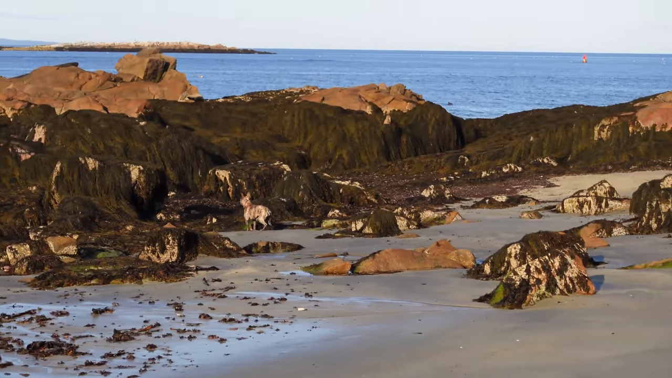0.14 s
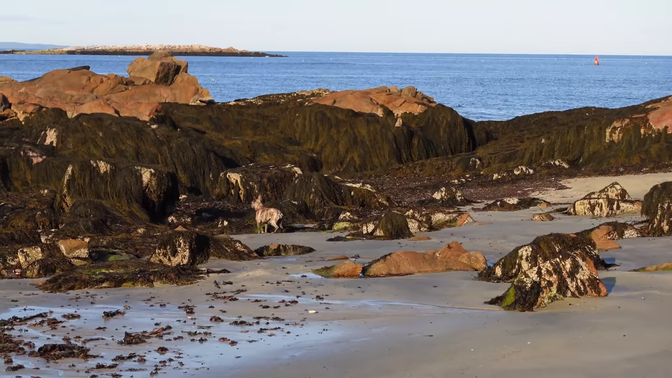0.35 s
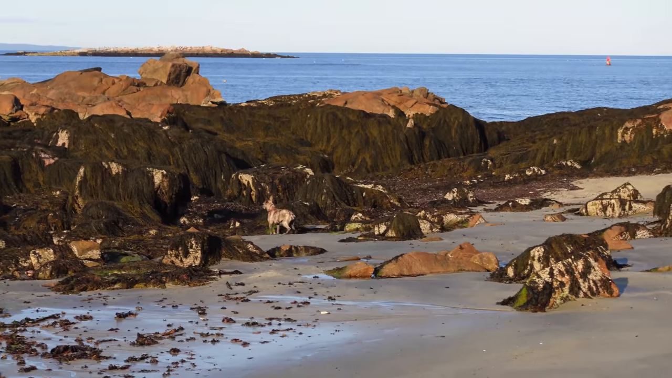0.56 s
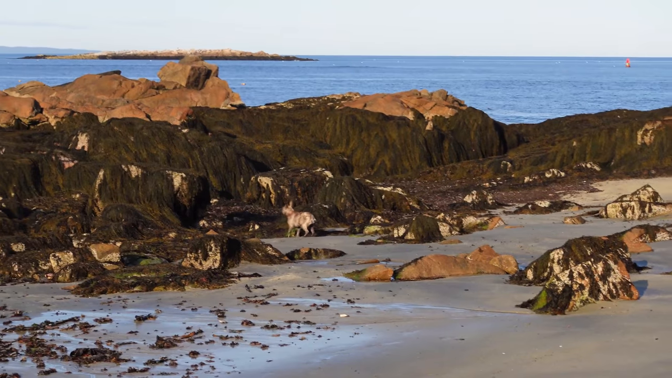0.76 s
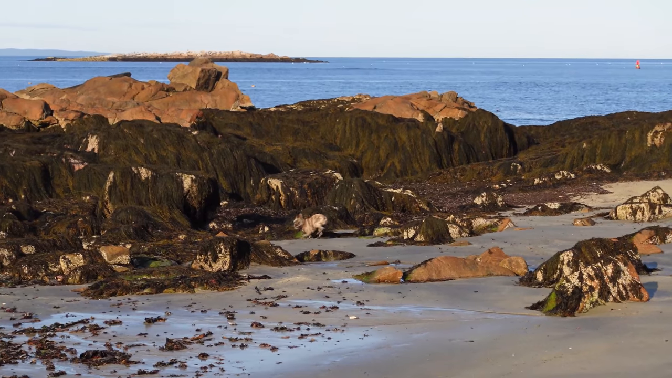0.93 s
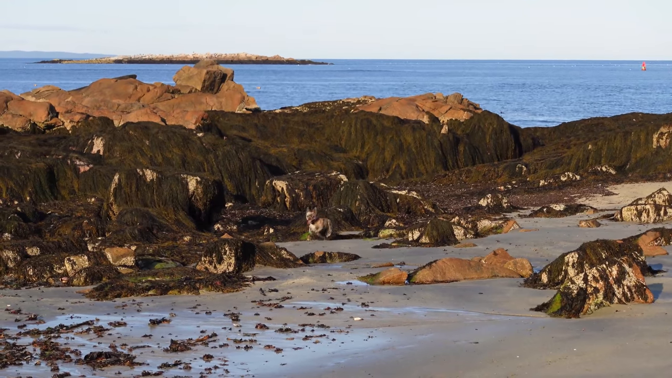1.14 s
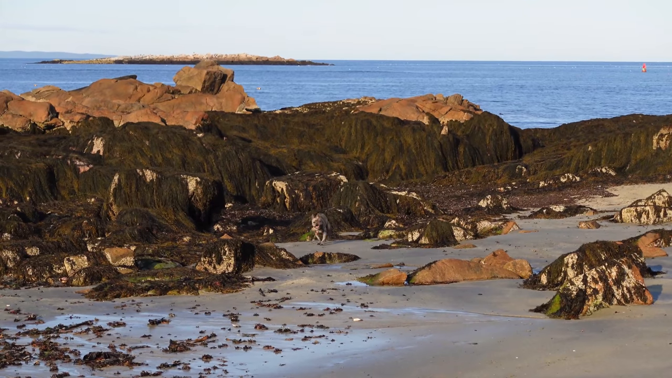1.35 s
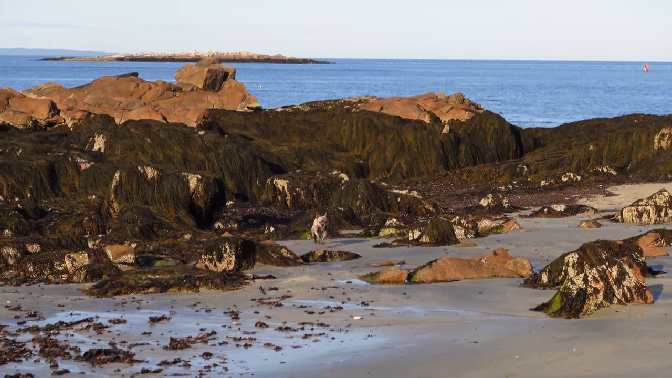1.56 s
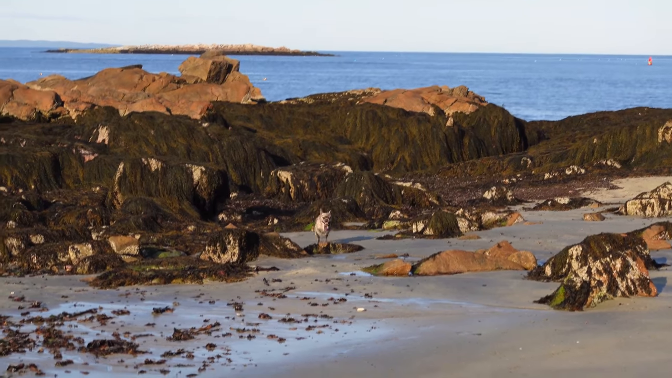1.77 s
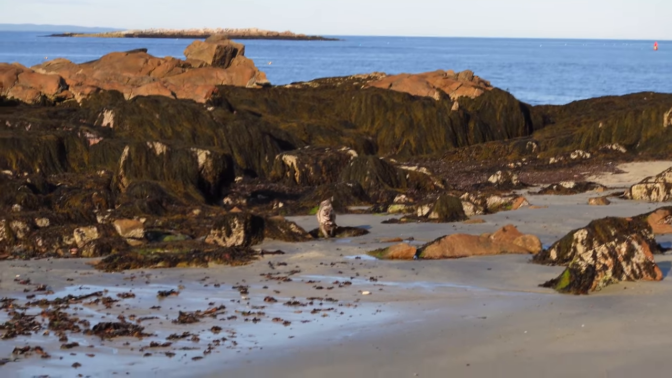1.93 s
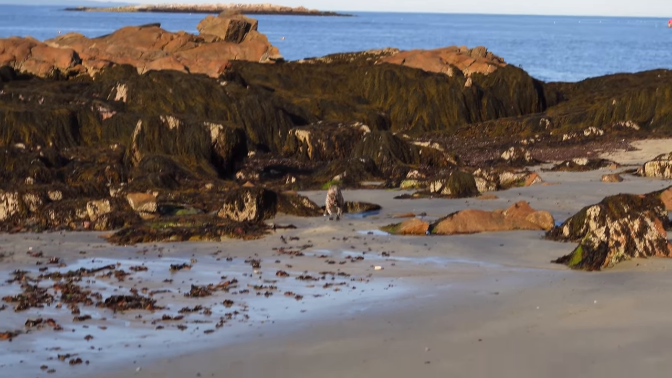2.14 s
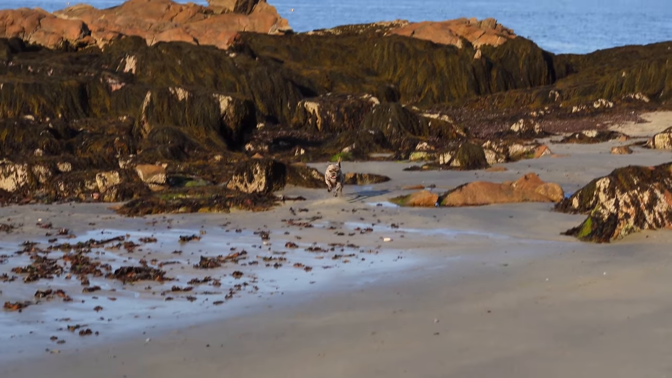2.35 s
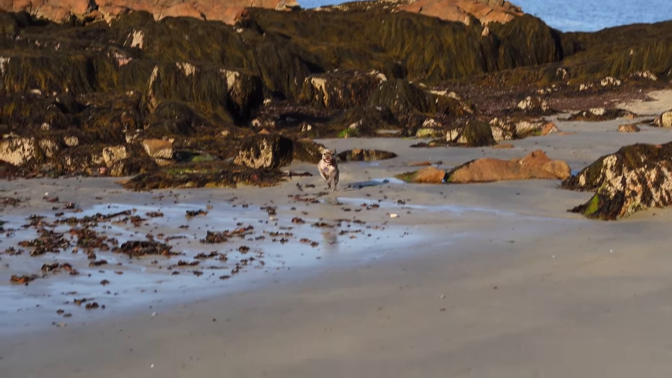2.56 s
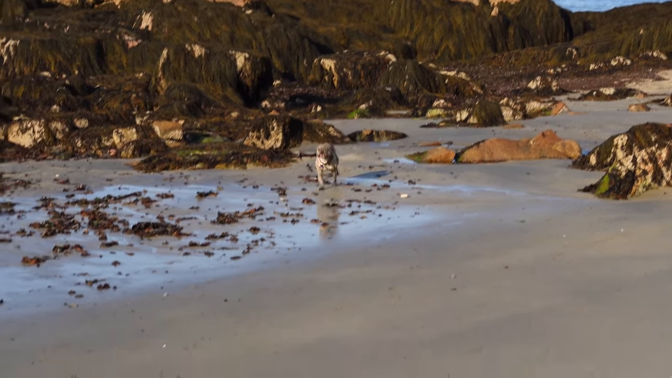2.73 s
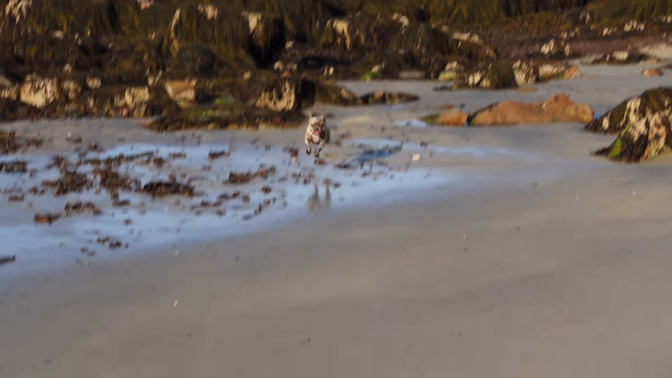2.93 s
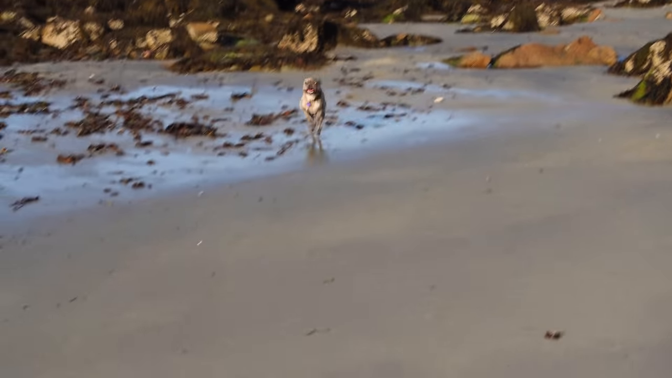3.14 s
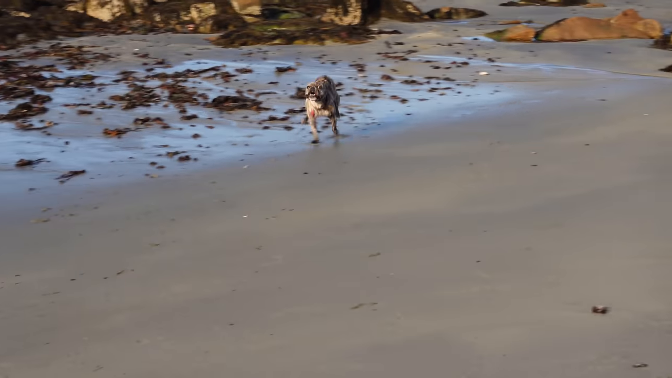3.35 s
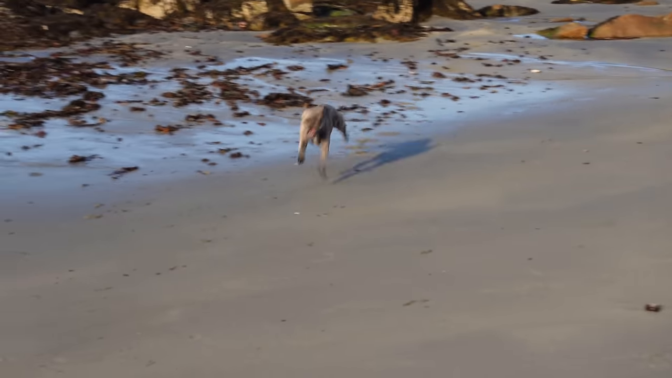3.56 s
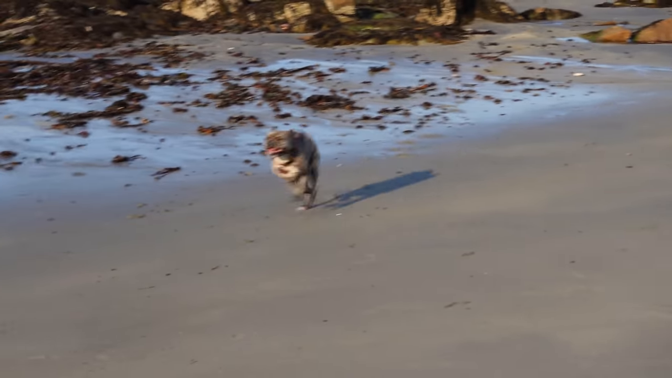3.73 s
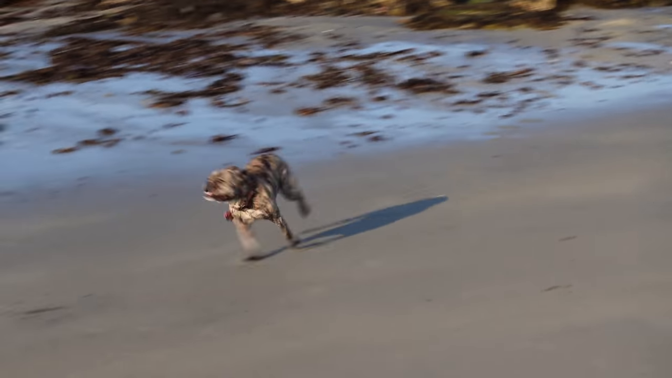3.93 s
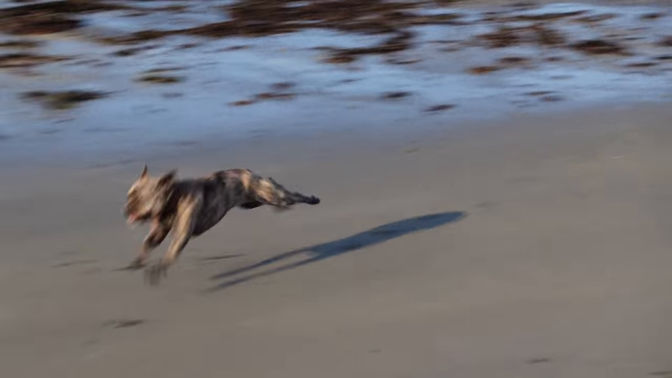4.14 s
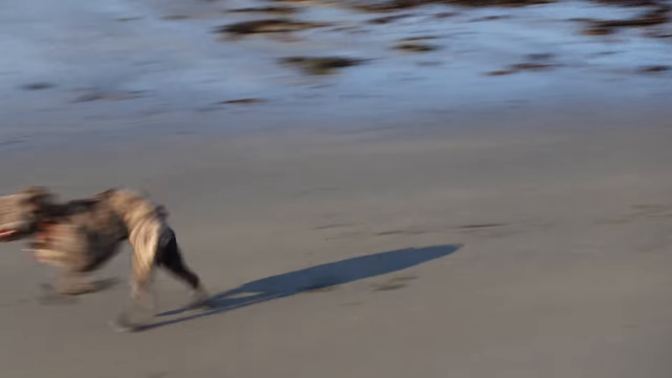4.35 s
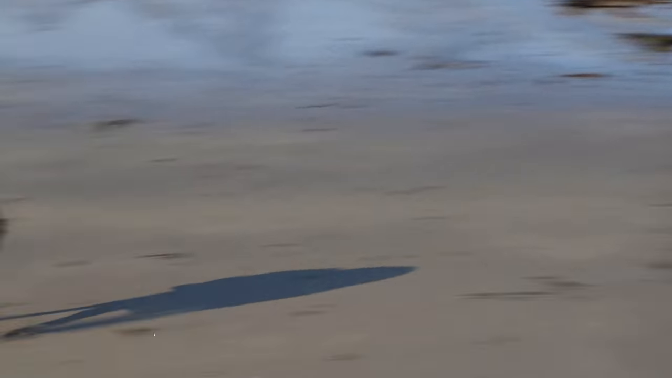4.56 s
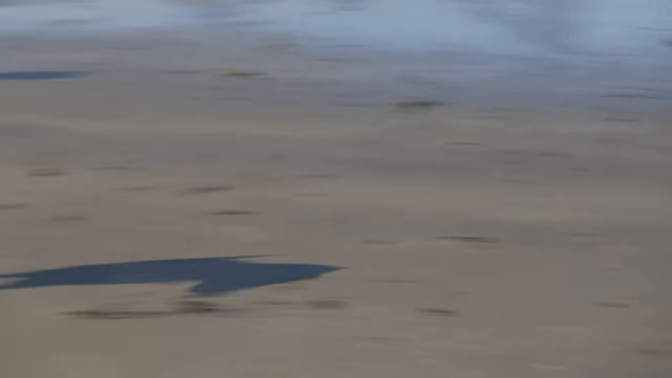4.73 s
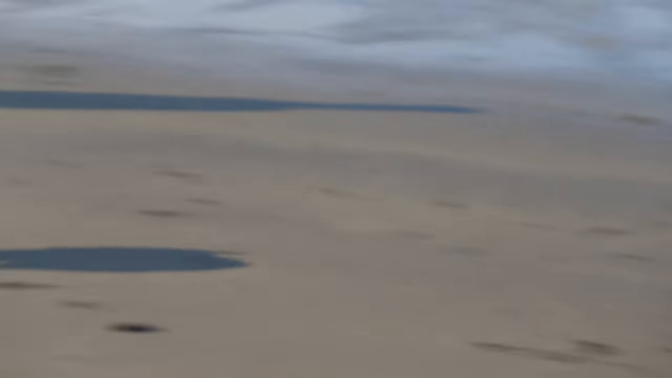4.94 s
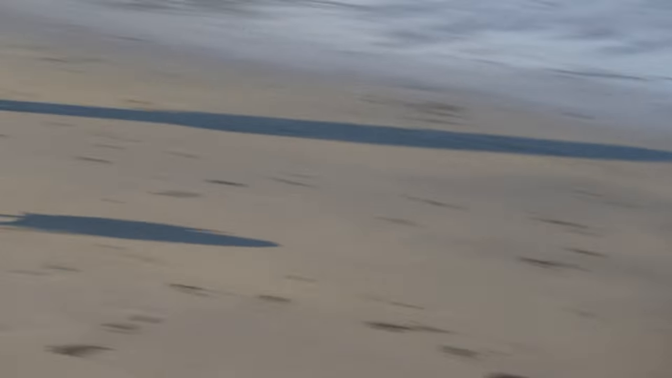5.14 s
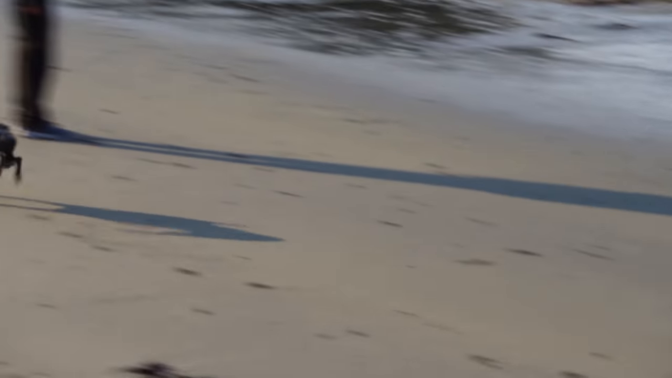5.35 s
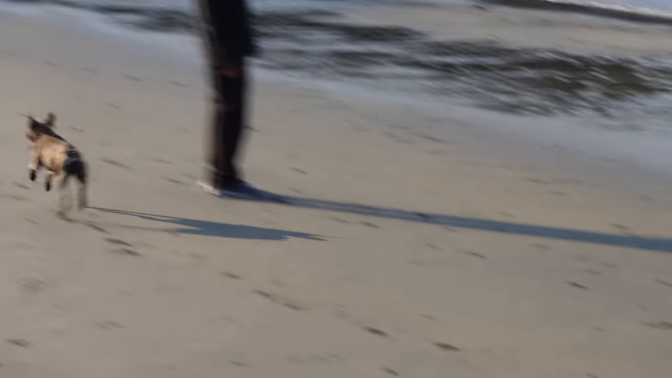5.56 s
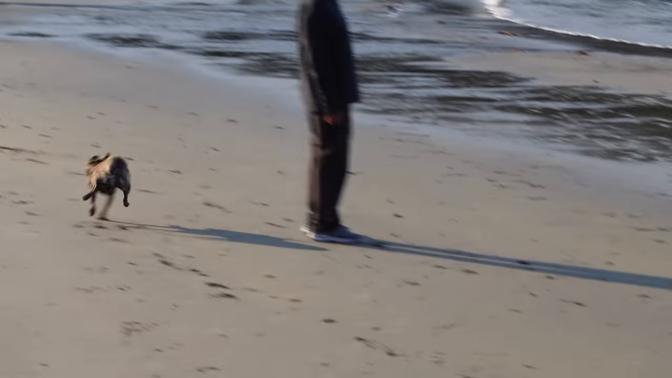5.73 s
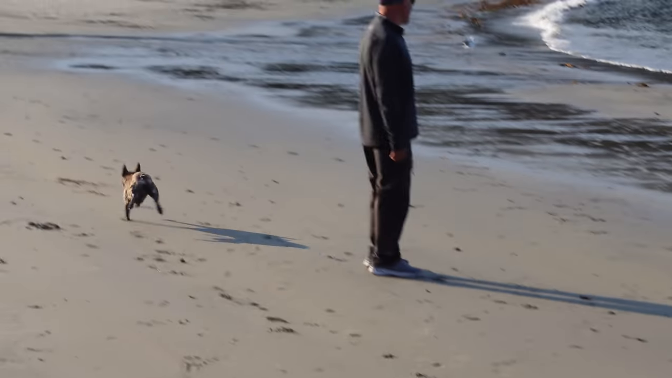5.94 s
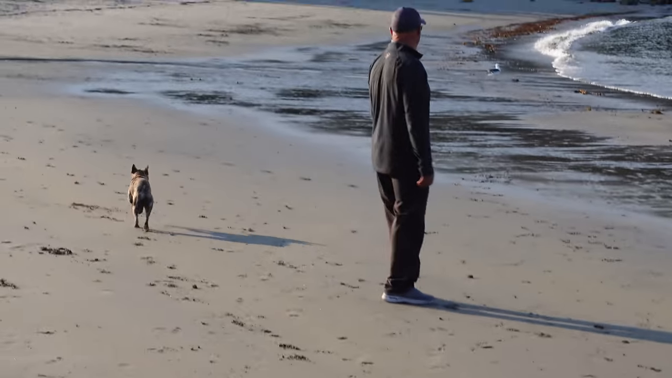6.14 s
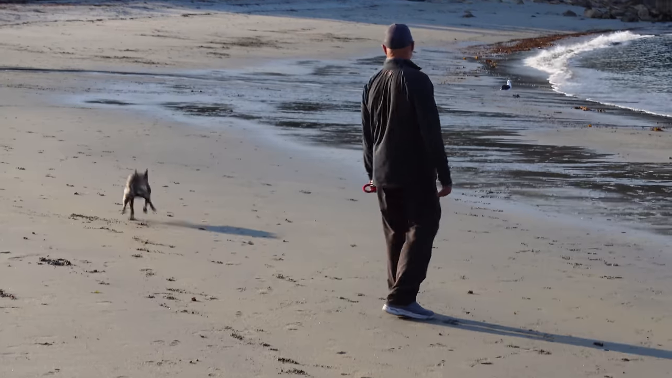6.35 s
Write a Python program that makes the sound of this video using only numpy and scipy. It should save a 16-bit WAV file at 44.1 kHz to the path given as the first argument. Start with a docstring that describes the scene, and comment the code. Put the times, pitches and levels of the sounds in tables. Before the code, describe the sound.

A quiet beach with soft, low far surf and small waves, heard in stereo and leaning left at first. A light watery gulp comes near 0.8 s, then a wave breaks and splashes from 1.2 to 1.9 s with a low boom, broad wash and fizzing foam. Faint metal tag clinks start about 1.8 s, and short, airy dog pants begin near 2.1 s, repeating about every 0.3 s. Small surges and gulps continue around 3 s. From 3.4 s the paws become quick gritty scuffs with sprayed sand; bright, dry tag clinks thicken, strongest from 4.0 to 4.7 s as the dog passes close, slightly left. Pants fade by 5.3 s. The scuffs and ticks then weaken as it runs away, while the sea shifts to the centre and deeper, hollow gulps and thumping waves rise from 5.6 s to the end at about 6.5 s.

```python
"""Dog galloping over wet sand

A small dog gallops toward the microphone, passes it and runs off beside small breaking waves.
Sea, spray: noise with random short-time spectra under level curves. Gulps: sines rising in pitch.
Paws, pants: noise puffs, coloured as sand or by mouth resonances. Grit: short dying sines.
Collar tags: noise ticks with dying sines, pitch-shifted by the dog's speed."""
import sys
import numpy as np
from scipy import signal
from scipy.fft import rfft, irfft
from scipy.io import wavfile
from scipy.ndimage import uniform_filter1d

SR = 44100
rng = np.random.default_rng(int(sys.argv[2]) if len(sys.argv) > 2 else 0)


def pcm_store(signal):
    """Save signal as 16-bit PCM."""
    levels = np.round(np.clip(np.atleast_2d(signal), -1, 1) * 32767)
    wavfile.write(sys.argv[1], SR, levels.astype(np.int16).T)


N = 286209

# Colours of the water layers and of the sand: f/Hz, density/(dB per Hz), relative
THUD_COLOUR = [(40, -38), (70, -11.5), (110, 1), (200, 5.5), (280, 0.5), (500, -44)]
BOOM_COLOUR = [(150, -38), (250, -16), (340, 0), (480, -3), (620, -1), (1000, -13), (3000, -56)]
WASH_COLOUR = [(200, -24), (480, -13.5), (720, 0.5), (1050, 1), (1450, -0.5), (2200, -5.5), (2800, -11.5),
               (4000, -14), (6000, -24), (12000, -95.5)]
FIZZ_COLOUR = [(2000, -9), (3000, -7.5), (4500, -1), (6500, -6.5), (9300, -12.5), (13000, -18)]
RUMBLE_COLOUR = [(20, -27), (55, -5), (85, 1.5), (130, 0), (220, -4), (450, -35), (2000, -14), (6000, -59),
                 (12500, -19), (14000, -39)]  # far surf
SAND_COLOUR = [(2500, -8), (4000, -7.5), (5500, 0.5), (6500, 3.5), (9300, -2.5), (13000, -5.5)]
# Left-right lean by frequency, bass wraps round the microphone: f/Hz, factor on the lean in dB
LEAN_SHARE = [(200, 0.12), (400, 0.52), (700, 0.78), (1300, 1.43), (2400, 1.7), (4400, 0.94), (9000, 1.5),
              (15000, 0.13)]
# Left-right likeness of the water noise: f/Hz, likeness/1
LIKENESS = [(25, .9), (60, .998), (250, .99), (640, .98), (1400, .94), (3100, .85), (6800, .85),
            (15000, .5)]
# Lean of the sea to the left until the microphone turns: t/s, lean/dB (before share and layer factor)
SEA_LEAN = [(0, 9.5), (1.1, 9.5), (1.4, 6.5), (2.2, 5), (3.3, 8), (3.7, 6.5), (4.45, 5), (5.4, -0.4),
            (6.49, -1)]
# Heavy falls of water: loudest t/s, rise/s, fall/s, level/dB, pitch/(factor on colour)
THUMPS = [(.63, .3, 0.098, -61, 0.77), (1.28, 0.081, 0.13, -55.5, 1.2), (1.48, 0.022, 0.03, -47, 0.86),
          (1.57, 0.13, 0.065, -44.5, 1.2), (1.66, 0.096, 0.091, -46, 1.7), (1.9, 0.42, 0.18, -59.5, 2),
          (2.76, 0.057, 0.35, -68, 0.94), (5.7, 0.082, 0.029, -56, 0.64), (5.9, 0.11, 0.25, -44, 1.17),
          (6.07, 0.24, 0.078, -39.5, 1), (6.4, 0.98, 0.23, -42.5, 1.16)]
# Surges of breaking waves: crest t/s, rise/s, fall/s, boom level/dB, wash level/dB, foam level/dB,
# pitch/(factor on boom colour)
SURGES = [(0, 0.27, 0.3, -58, -69.5, -99, 1.32), (.75, 0.83, 0.13, -52, -61, -111, 0.83),
          (1.0, 0.73, 0.11, -61.5, -91, -79, 0.91), (1.17, 0.08, 0.14, -62, -84, -66, 0.82),
          (1.212, 0.015, 0.063, -53.5, -57, -55, 2.04), (1.272, 0.016, 0.036, -48, -59, -46, 2),
          (1.33, 0.05, 0.13, -54, -45.5, -48.5, 2), (1.48, 0.067, 0.18, -46, -40.5, -46.5, 1.85),
          (1.658, 0.2, 0.13, -37.5, -36, -45.5, 0.87), (1.85, 0.67, 0.16, -56.5, -39, -48, 1.3),
          (2.05, 0.17, 0.17, -46.5, -48.5, -52.5, 2.13), (2.3, 0.28, 0.39, -72, -61.5, -61, 1.5),
          (2.93, 0.32, 0.083, -54.5, -59, -60, 1.28), (3.05, 0.15, 0.038, -48, -60, -79, 0.94),
          (3.24, 0.32, 0.052, -47, -51.5, -50.5, 0.8), (3.44, 0.4, 0.12, -48, -58, -49.5, 0.94),
          (3.69, 0.22, 0.22, -64, -53, -48.5, 1.4), (3.98, 0.98, 0.2, -51.5, -49.5, -55.5, 0.83),
          (4.24, 0.25, 0.2, -54, -53.5, -60, 0.83), (4.48, 0.36, 0.27, -58.5, -54.5, -72, 0.86),
          (4.91, 0.25, 0.56, -59.5, -59.5, -61, 1.58), (5.25, 0.29, 0.13, -60, -58, -69, 1.16),
          (5.58, 0.27, 0.19, -49, -52, -82, 1.58), (5.71, 0.16, 0.066, -41, -56.5, -80, 0.69),
          (5.82, 0.28, 0.16, -59, -56, -71, 1.2), (5.94, 0.4, 0.14, -44, -59, -56, 1.1),
          (6.07, 0.038, 0.07, -44, -53, -64, 2.15), (6.2, 0.32, 0.15, -36.5, -51, -60.5, 0.83),
          (6.37, 0.11, 0.15, -38, -50.5, -60, 0.7)]
# Air trapped under falling waves: onset t/s, level/dB (peak 5.3 dB lower), nominal f/Hz
GULPS = [(0.771, -44, 417), (1.463, -34.5, 856), (1.519, -29, 137), (2.913, -37, 620), (3.038, -46, 493),
         (3.198, -37.5, 372), (4.014, -38.5, 357), (5.583, -29.5, 583), (5.701, -26.5, 312),
         (5.923, -22, 270), (6.076, -40, 390), (6.346, -31, 239)]
# Path of the dog: t/s, speed toward microphone/(m/s), lean to the left/dB
DOG_PATH = [(1.5, -3, -3), (2.5, 7.5, 2), (4.0, 6, 1.5), (4.5, 3.5, 1.5), (4.8, 1.5, 2.5), (5.1, -2.5, 3),
            (5.6, -4, 1.5), (6.49, -4, -0.5)]
# Sand and water thrown up by each bound: loudest t/s, rise/s, fall/s, level/dB
BOUNDS = [(2.41, 0.093, 0.064, -54.5), (2.65, 0.13, 0.11, -53), (2.88, .1, 0.12, -59.5),
          (3.16, 0.035, 0.33, -53.5), (3.48, 0.067, 0.2, -52), (3.77, 0.16, 0.24, -49),
          (4.05, 0.12, 0.36, -49.5), (4.33, 0.071, 0.031, -44.5), (4.48, 0.16, 0.035, -43),
          (4.74, 0.31, 0.071, -45.5), (4.92, 0.1, 0.041, -48), (5.02, 0.082, 0.13, -53),
          (5.21, 0.18, 0.19, -53), (5.5, 0.11, 0.13, -54), (5.64, 0.078, 0.059, -59),
          (5.8, 0.097, 0.59, -63), (6.22, 0.47, 0.1, -57), (6.45, 0.13, .1, -58)]
# Paw scuffs: t/s, peak level/dB
PAWS = [(2.702, -38), (2.98, -43), (3.435, -36), (3.594, -37), (3.741, -34.5), (3.848, -38), (3.8903, -32),
        (3.9777, -34), (4.019, -29), (4.149, -32), (4.19, -28.5), (4.27, -31), (4.311, -27), (4.408, -39),
        (4.482, -27.5), (4.551, -27), (4.59, -26.5), (4.717, -27), (4.847, -30.5), (4.885, -31.5),
        (4.9833, -35), (5.0226, -34), (5.062, -33.5), (5.095, -32), (5.144, -30.5), (5.186, -32.5),
        (5.226, -37.5), (5.293, -40), (5.335, -37), (5.372, -37.5), (5.44, -31.5), (5.477, -34),
        (5.5706, -37), (5.612, -42), (5.754, -35.5), (5.7976, -36.5), (5.904, -41), (5.945, -38.5),
        (6.0335, -35), (6.0894, -37), (6.201, -39), (6.3553, -34.5), (6.404, -37)]
# Pants: loudest t/s, level/dB, mouth resonance f/Hz, lower resonance level/dB re mouth,
# upper resonance level/dB re mouth, length scale/s
PANTS = [(2.075, -50, 4030, -20, -1, 0.043), (2.322, -58.5, 3560, -16, -2, 0.048),
         (2.597, -45.5, 3660, -26, -13, 0.05), (2.861, -44, 3520, -26, -14, 0.059),
         (3.178, -41.5, 3640, -15, -12, 0.086), (3.468, -42, 3510, -1, -14, 0.083),
         (3.759, -44.5, 3240, 4, -2.5, 0.079), (4.063, -41.5, 2270, -20, 1, 0.063),
         (4.359, -42.5, 2100, -16, -1.5, 0.067), (4.492, -41.5, 1740, -22, -4, 0.0088),
         (4.628, -60.5, 1930, 10, 9.5, 0.08), (4.921, -55.5, 1940, -13, 0.5, 0.11),
         (5.241, -58, 1900, 7, -7, 0.073)]
# Tag clinks: t/s, tick level/dB, ring level/dB, high ring level/dB, tick centre f/Hz
CLINKS = [(1.8134, -57, -49, -84, 5500), (1.8513, -60, -37.5, -76, 5640), (1.955, -41, -46, -76, 5320),
          (1.9753, -36, -42.5, -56, 5000), (2.357, -26, -38.5, -41, 6740), (2.415, -31, -59, -66, 6360),
          (2.6294, -23.5, -27, -25, 7300), (2.6358, -27.5, -33, -49, 5540), (2.892, -31, -43, -43, 6000),
          (3.102, -53, -45, -72, 4910), (3.207, -25, -45, -50, 7100), (3.2123, -30, -30, -24.5, 6800),
          (3.3538, -35, -29, -39, 5000), (3.7851, -21.5, -22, -22, 5900), (3.964, -29, -32, -37, 5640),
          (4.001, -36, -44, -42, 5350), (4.0358, -17.5, -26, -31, 7860), (4.085, -8.5, -31, -28, 7280),
          (4.2203, -29, -40.5, -41, 5540), (4.312, -39, -41, -39, 6900), (4.3245, -36, -54, -60, 8000),
          (4.377, -13.5, -25.5, -18, 6160), (4.3791, -6.5, -38, -40, 6400), (4.3835, -21, -44, -50, 8300),
          (4.4575, -28, -30, -30, 6700), (4.463, -40, -30.5, -62, 8200), (4.475, -41, -34, -60, 7200),
          (4.4832, -36, -36, -34, 6170), (4.508, -22, -43, -40, 6840), (4.551, -34, -60, -60, 6300),
          (4.6584, -10.5, -15, -47, 6030), (4.665, -28, -50, -65, 6360), (4.774, -29, -26, -35, 5600),
          (4.7757, -30, -33, -44, 5550), (4.7912, -26, -41, -40, 7600), (4.8075, -43, -57, -70, 8300),
          (4.942, -37, -60, -60, 8000), (4.9492, -17.5, -53, -30, 7200), (5.0053, -45, -32.5, -50, 5370),
          (5.027, -41, -39, -69, 8100), (5.1031, -28.5, -47, -48, 5500), (5.206, -30, -39, -34, 6400),
          (5.272, -43, -55, -70, 8500), (5.281, -36, -57, -70, 8300), (5.485, -26.5, -43, -66, 7740),
          (5.491, -24.5, -39, -65, 7600), (5.4999, -37, -45, -69, 6860), (5.5447, -29.5, -43, -75, 5900),
          (5.5523, -33, -53, -72, 6300), (5.63, -35, -42.5, -78.5, 7650), (5.652, -35, -48, -86, 7900),
          (5.86, -32.5, -44.5, -75, 7700), (6.0887, -38, -45, -78, 6490), (6.1612, -34, -40.5, -51, 8260),
          (6.294, -44, -51, -75, 8500), (6.43, -44, -42, -52, 7800), (6.476, -45, -60, -60, 8500)]
# Modes of the tags, low and high: f/Hz, level/dB re ring, nominal 60 dB fall/s
TAG_MODES = [(8860, 3, .021), (8980, -21, .045), (5330, -12, .022)]
TAG_HIGH_MODES = [(12100, 0, 0.013), (12900, -1, .011), (10900, 3.5, 0.006)]
# Response of the microphone: f/Hz, gain/dB
MICROPHONE = [(25, -49), (60, -18), (90, -2), (9400, -0.5), (10200, -9), (12800, -15), (14000, -23),
              (16000, -30)]

RUMBLE_DB = -69.5
CALM_THUD_DB, CALM_BOOM_DB, CALM_WASH_DB, CALM_FOAM_DB = -68, -76.5, -63.5, -83.5  # between surges
BOOM_POWER, WASH_POWER, FOAM_POWER = 1.4, 0.74, 0.78  # on surge shape: boom gathers, foam spreads
WASH_BEND_POWER = 0.12  # wash slightly follows the boom's pitch
FOAM_LAG_S, FOAM_SOFT_S = 0.0043, 0.056  # foam comes later and swells more softly
STILL_DB = -89  # spray between bounds
GRIT_PER_S, GRIT_DB = 90, 3  # grains and drops landing; dB re spray level
SCUFF_HALF_RISE_S, SCUFF_LENGTH_S = .0035, .011
UPPER_HZ, HISS_DB = 5100, -9  # second mouth resonance; hiss re mouth resonance
GLIDE_OCTAVES = -0.16  # per length of a pant: the mouth closes in
LOWER_SHARE, LOWER_LATE = 0.765, 0.14  # lower resonance: factor on mouth Hz, opening in pant lengths
PANT_LEAD_S = .12
DAMPING_OCTAVES, DETUNE = .3, .01  # largest stray of decay and pitch (share) per blow
HOLD_POWER = 1.4  # ring holds a moment, then the tags smother each other
SWING_DB = 4.5  # swinging tags throw the high ring left or right, largest gain per side
SOUND_M_PER_S = 343
EDGE_HZ = 16300


def gain_of(db):
    """Decibels to amplitude gain."""
    return 10 ** (np.asarray(db) / 20)


def evened(x):
    """Scales to rms 1."""
    return x / np.sqrt(np.mean(x ** 2) + 1e-20)


def read(points, hz):
    """Reads a (Hz, value) table on a log-frequency axis."""
    f, value = np.transpose(points)
    return np.interp(np.log(hz + 1), np.log(f + 1), value)


def curves(rows):
    """Each value column of a (s, value, ..) table at every sample."""
    s, *columns = np.transpose(rows)
    return [np.interp(np.arange(N) / SR, s, c) for c in columns]


def add(mix, s, sound):
    """Adds a sound at time s."""
    part = mix[round(s * SR):][:len(sound)]
    part += sound[:len(part)]


def swells(rows):
    """One shape a row of (peak s, rise s, fall s, ..), per ms: straight rise to 1, rounded fall."""
    s, rise, fall = np.array(rows)[:, :3].T[:, :, None]
    t = np.arange(0, N / SR + .002, .001) - s
    return np.where(t < 0, np.clip(1 + t / abs(rise), 0, 1), np.exp(-(t / fall) ** 2))


def per_sample(x):
    """Milliseconds to samples."""
    return np.interp(np.arange(N) / SR, np.arange(len(x)) / 1000, x)


def swell_power(rows, column, shape_power):
    """Power of each swell, peaking at the dB in the column."""
    return (gain_of(np.array(rows)[:, column, None]) * swells(rows) ** shape_power) ** 2


def level(rows, column, calm_db, shape_power=1):
    """Level in dB of all swells, added in power over a calm floor."""
    power = swell_power(rows, column, shape_power)
    return per_sample(10 * np.log10(power.sum(axis=0) + gain_of(calm_db) ** 2))


def pitch_of(rows, shape_power=1):
    """Pitch factor (last column), weighted by swell power (column 3)."""
    share = swell_power(rows, 3, shape_power) + 1e-12
    pitch = (share * np.array(rows)[:, -1:]).sum(axis=0) / share.sum(axis=0)
    return np.clip(per_sample(pitch), .3, 3)


def resonate(x, hz, width_hz):
    """Resonance of gain 1: shifts the curve hz to zero, smooths, shifts back."""
    turn = np.exp(2j * np.pi * np.cumsum(hz * np.ones(len(x))) / SR)
    r = np.exp(-np.pi * width_hz / SR)
    return 2 * (turn * signal.lfilter([1 - r], [1, -r], x / turn + 1e-18)).real


def water(colour, level_db, lean_db, patchy_db, flicker_db, size, pitch=np.ones(N)):
    """Random short-time spectra with drifting patches and flicker shared by all bands."""
    frames, hz = 4 * N // size + 5, np.fft.rfftfreq(size, 1 / SR)
    at = np.minimum(np.arange(frames) * size // 4, N - 1)
    a, b, c, d, patches = rng.standard_normal((frames, len(hz), 5)).T
    patches = uniform_filter1d(patches, size=3, axis=0)  # over frequency
    patches = evened(uniform_filter1d(patches, size=14, axis=1))  # over time
    flicker = evened(uniform_filter1d(rng.standard_normal(frames), size=3))

    same = np.clip(read(LIKENESS, hz), -1, 1)[:, None]
    left = a + 1j * b
    right = same * left + np.sqrt(1 - same ** 2) * (c + 1j * d)
    shape = gain_of(read(colour, hz[:, None] / pitch[at]))
    shape = shape / np.linalg.norm(shape, axis=0)
    z = np.array([left, right]) * shape * gain_of(patchy_db * patches + flicker_db * flicker)

    lean = gain_of(read(LEAN_SHARE, hz)[:, None] * lean_db[at] / 2)
    z = np.array([z[0] * lean, z[1] / lean])
    z /= np.sqrt((lean ** 2 + lean ** -2) / 2)  # lean keeps the power
    noise = signal.istft(z, nperseg=size, noverlap=3 * size // 4)[1][:, :N]
    return gain_of(level_db) * evened(noise)


def sea():
    """Noise bands: thud, boom, wash and fizz of the waves over steady far surf."""
    lean_db = curves(SEA_LEAN)[0]
    thud_db = level(THUMPS, column=3, calm_db=CALM_THUD_DB)
    boom_db = level(SURGES, column=3, calm_db=CALM_BOOM_DB, shape_power=BOOM_POWER)
    wash_db = level(SURGES, column=4, calm_db=CALM_WASH_DB, shape_power=WASH_POWER)
    foam_db = level(SURGES, column=5, calm_db=CALM_FOAM_DB, shape_power=FOAM_POWER)
    foam_db = uniform_filter1d(foam_db, size=round(FOAM_SOFT_S * SR))
    foam_db = np.interp(np.arange(N) - FOAM_LAG_S * SR, np.arange(N), foam_db)
    boom_pitch = pitch_of(SURGES, BOOM_POWER)
    wash_pitch = pitch_of(SURGES, WASH_POWER) ** WASH_BEND_POWER

    thud = water(THUD_COLOUR, thud_db, lean_db, patchy_db=1.5, flicker_db=3.5, size=1024,
                 pitch=pitch_of(THUMPS))
    boom = water(BOOM_COLOUR, boom_db, lean_db, patchy_db=2.0, flicker_db=-0.5, size=512,
                 pitch=boom_pitch)
    wash = water(WASH_COLOUR, wash_db, lean_db, patchy_db=1.87, flicker_db=0.72, size=512,
                 pitch=wash_pitch)
    fizz = water(FIZZ_COLOUR, foam_db, 1.18 * lean_db, patchy_db=2.3, flicker_db=0.76, size=256)
    rumble = water(RUMBLE_COLOUR, RUMBLE_DB, 0.21 * lean_db, patchy_db=1.5, flicker_db=0.8, size=1024)
    return thud + boom + wash + fizz + rumble


def gulps():
    """Each trapped pocket of air rings for a few cycles, rising in pitch."""
    out, t = np.zeros(N), np.arange(4000) / SR
    swell = (t / 0.013) ** 2 * np.exp(2 - 2 * t / 0.0096)
    for s, db, hz in GULPS:
        add(out, s, gain_of(db) * swell * np.sin(2 * np.pi * hz * t * (.97 + 1.5 * t)))
    return out


def spray_level():
    """Level in dB of the sand and water in the air."""
    return level(BOUNDS, column=3, calm_db=STILL_DB)


def spray(lean_db):
    """Sand-coloured noise swelling with each bound."""
    return water(SAND_COLOUR, spray_level(), lean_db, patchy_db=3.5, flicker_db=0.5, size=256)


def grit():
    """Sparse dry ticks: dying sines of uneven size that follow the spray."""
    t = np.arange(200) / SR
    lands = rng.random(N) < GRIT_PER_S / SR
    sizes = lands * gain_of(5.0 * np.minimum(rng.exponential(1, N), 3))
    kinds, out = rng.integers(0, 3, N), np.zeros(N)
    for k, hz in enumerate([5600, 7000, 8500]):
        tick = np.sin(2 * np.pi * hz * t) * gain_of(-60 * t / 0.0017)
        out += signal.oaconvolve(sizes * (kinds == k), tick)[:N]
    return out * gain_of(spray_level() + GRIT_DB)


def paws():
    """Each paw throws up a gritty puff: spiky sand-coloured noise, quick bite, rounded fall."""
    out, t = np.zeros(N), np.arange(4096) / SR
    colour = gain_of(read(SAND_COLOUR, np.fft.rfftfreq(len(t), 1 / SR)))
    shape = np.minimum(t / SCUFF_HALF_RISE_S / 2, 1) * np.exp(-(t / SCUFF_LENGTH_S) ** 2)
    for s, db in PAWS:
        noise = rng.standard_normal(len(t))
        grains = gain_of(1.8 * rng.exponential(1, len(t)))
        scuff = shape * irfft(rfft(noise * grains) * colour)
        add(out, s - SCUFF_HALF_RISE_S, gain_of(db) * scuff / abs(scuff).max())
    return out


def two_resonances(air, hz, narrow_hz, wide_hz):
    """Air through two resonances in series, at rms 1."""
    return evened(resonate(resonate(air, hz, narrow_hz), hz, wide_hz))


def panting():
    """Rough air through the resonances of the open mouth, swelling slowly and stopping faster."""
    out = np.zeros(N)
    for s, db, hz, lower_db, upper_db, length_s in PANTS:
        air, flutter = rng.standard_normal((2, 8192))
        u = (np.arange(len(air)) / SR - PANT_LEAD_S) / length_s  # 0 at the loudest
        swell = np.exp(-abs(u / np.where(u < 0, .5, .3)) ** 1.33)
        air = air * gain_of(1.8 * evened(uniform_filter1d(flutter, size=90)))
        hz = hz * 2 ** (GLIDE_OCTAVES * np.clip(u, -1, 1))
        mouth = two_resonances(air, hz, 600, 1200)
        upper = two_resonances(air, UPPER_HZ, 400, 900)
        lower = two_resonances(air, LOWER_SHARE * hz, 700, 1400) / (1 + np.exp(-u / LOWER_LATE))
        hiss = evened(resonate(resonate(air, 6900, 3200), 8300, 3900))
        breath = mouth + gain_of(lower_db) * lower + gain_of(upper_db) * upper + gain_of(HISS_DB) * hiss
        add(out, s - PANT_LEAD_S, gain_of(db) * swell * breath)
    return out


def ringing(modes, t, shift, chance):
    """Dying sines, quick soft start; the touch of the other tag damps and detunes each blow anew."""
    rings = np.zeros(len(t))
    for (hz, db, t60), (phase, touch, bend) in zip(modes, chance):
        fall = (t / t60 * 2 ** (DAMPING_OCTAVES * touch)) ** HOLD_POWER
        mode_hz = hz * shift * (1 + DETUNE * bend)
        rings += gain_of(db - 60 * fall) * np.sin(2 * np.pi * (mode_hz * t + phase))
    return rings * (1 - np.exp(-t / 0.00038))


def tick_of(hz, t):
    """Short broad noise burst around hz, peak 1, with the snap of the blow."""
    noise = rng.standard_normal(len(t))
    burst = noise * gain_of(-60 * t / 0.0062) * (1 - np.exp(-t / 0.0001))
    tick = resonate(resonate(burst, hz, 1200), hz, 2600) + .15 * burst
    # a small thing radiates no bass
    tick = signal.lfilter(*signal.butter(8, 5000, "high", fs=SR), tick)
    snap = signal.lfilter(*signal.butter(2, 3200, "high", fs=SR), burst * gain_of(-60 * t / .004))
    tick = tick + .045 * snap
    return tick / abs(tick).max()


def collar():
    """Each clink is a tick and the ring of the tags, Doppler-shifted by the dog's speed."""
    out, t, speed = np.zeros((2, N)), np.arange(3000) / SR, curves(DOG_PATH)[0]
    for s, tick_db, ring_db, high_db, hz in CLINKS:
        chance = rng.uniform(-1.0, 1, (6, 3))
        shift = 1 + speed[round(s * SR)] / SOUND_M_PER_S
        clink = gain_of(tick_db) * tick_of(hz, t)
        clink += gain_of(ring_db) * ringing(TAG_MODES, t, shift, chance[:3])
        high = gain_of(high_db) * ringing(TAG_HIGH_MODES, t, shift, chance[3:])
        swing = gain_of(SWING_DB * chance[5, 0])
        add(out[0], s, clink + high * swing)
        add(out[1], s, clink + high / swing)
    return out


def scene():
    """The sea, then the spray and the dog, placed left or right."""
    lean_db = curves(DOG_PATH)[1]
    dog = collar() + paws() + grit() + panting()
    dog = dog * gain_of([lean_db / 2, -lean_db / 2])
    return sea() + gulps() + spray(lean_db) + dog


def record(dry):
    """Colour of the microphone, then the band limit."""
    hz = np.linspace(0, SR / 2, 2049)
    response = signal.firwin2(2047, hz, gain_of(read(MICROPHONE, hz)), fs=SR)
    heard = signal.oaconvolve(dry, response[None], "same")
    limit = signal.firwin(511, EDGE_HZ, window=("kaiser", 9), fs=SR)
    return signal.oaconvolve(heard, limit[None], "same")


dry = scene()
out = record(dry)
pcm_store(out)
```